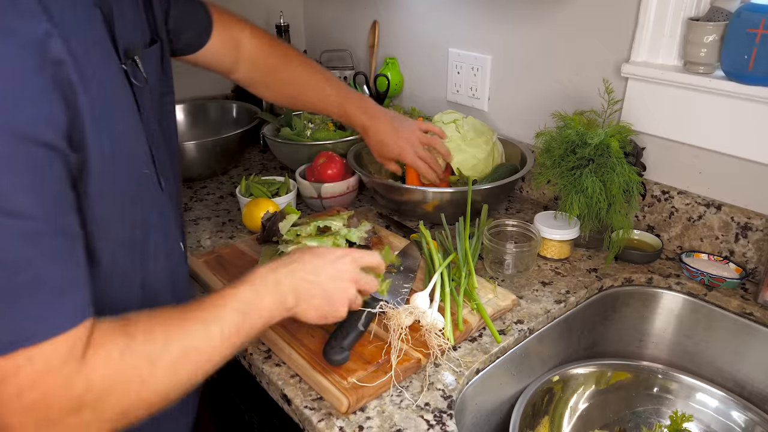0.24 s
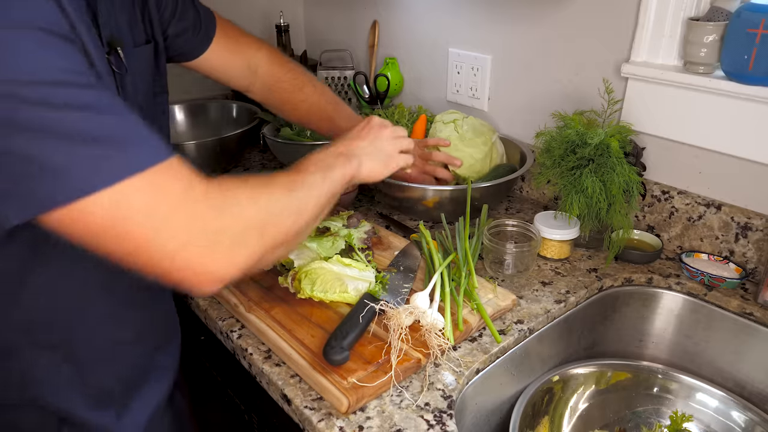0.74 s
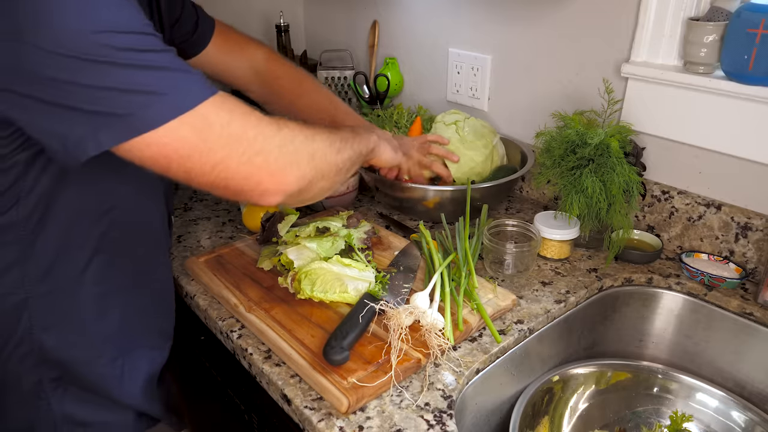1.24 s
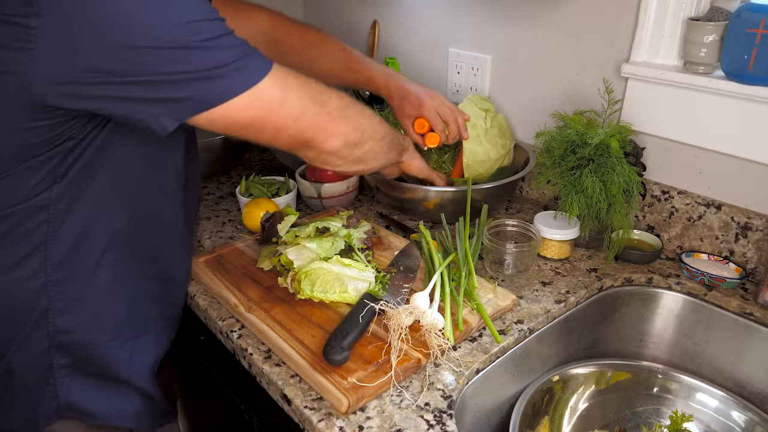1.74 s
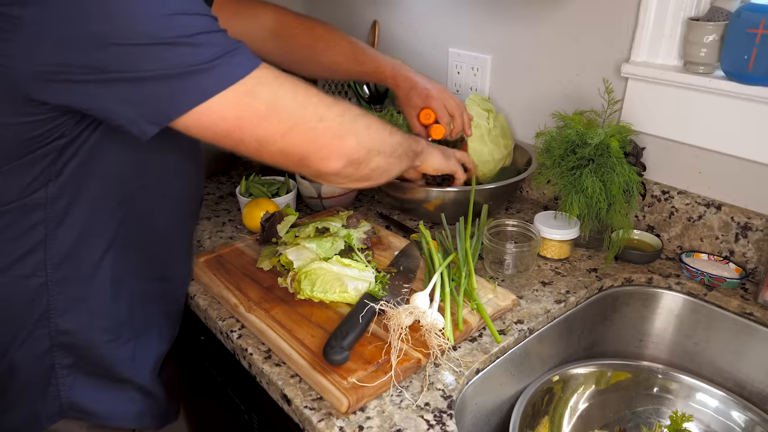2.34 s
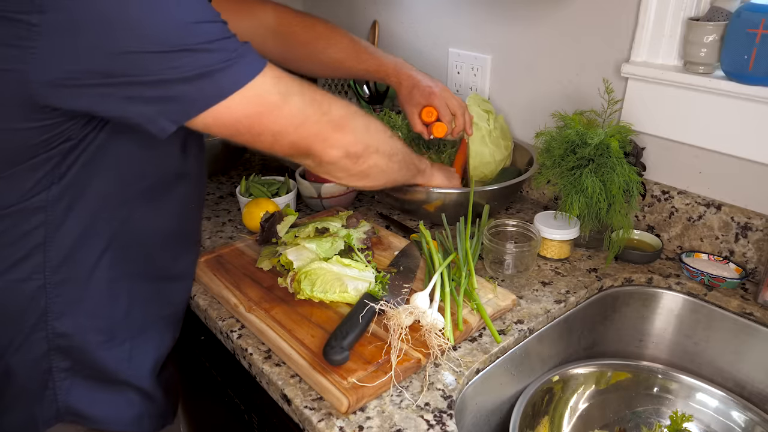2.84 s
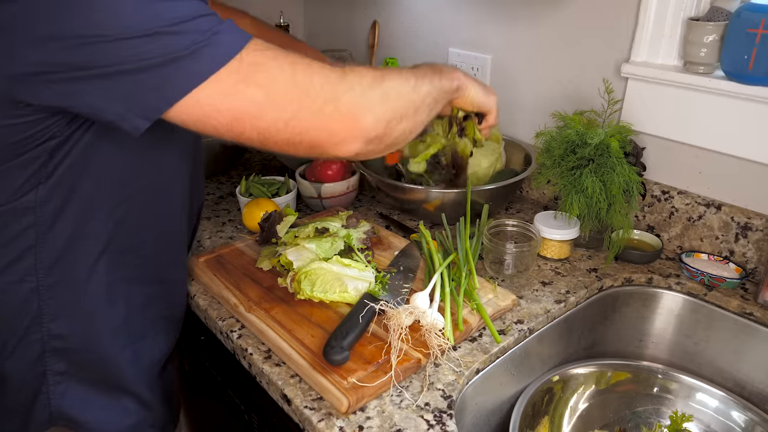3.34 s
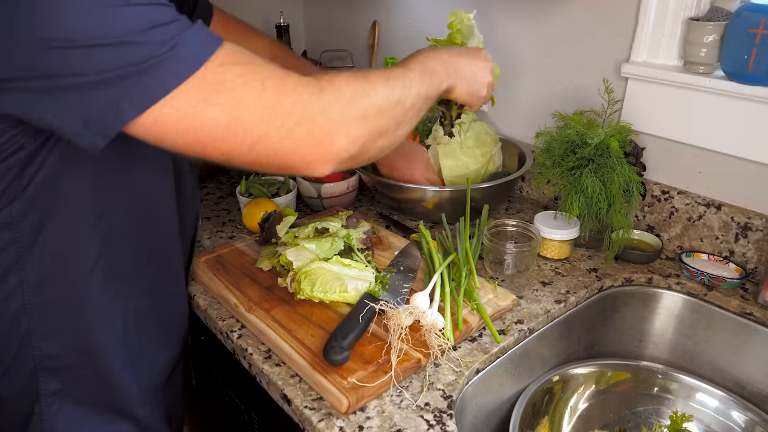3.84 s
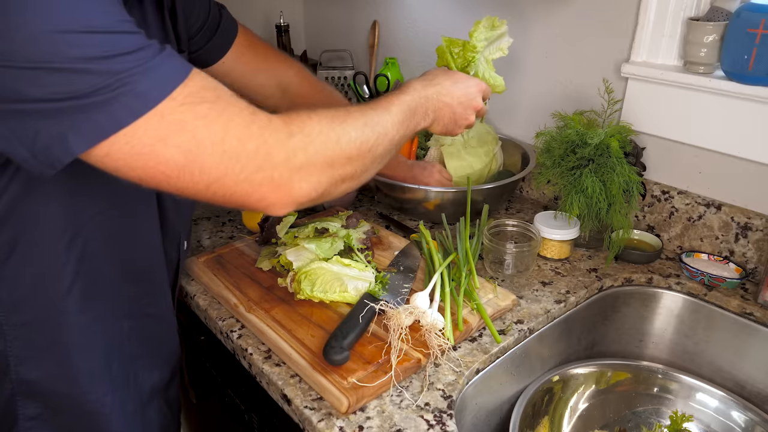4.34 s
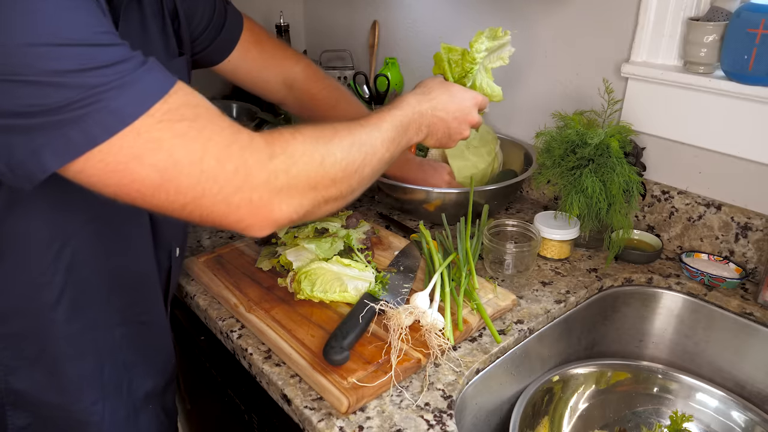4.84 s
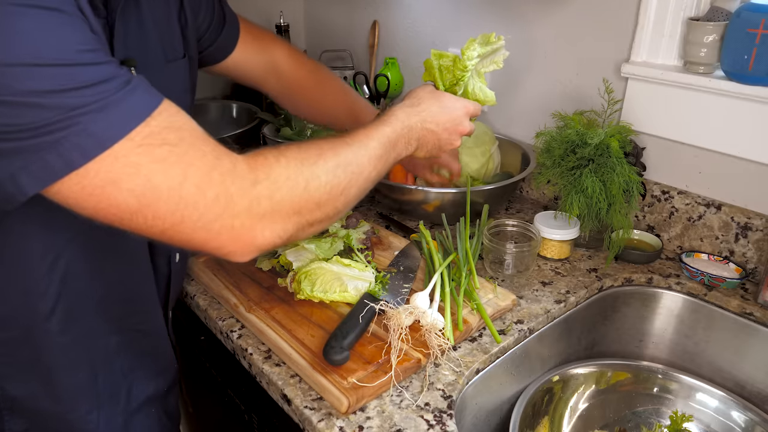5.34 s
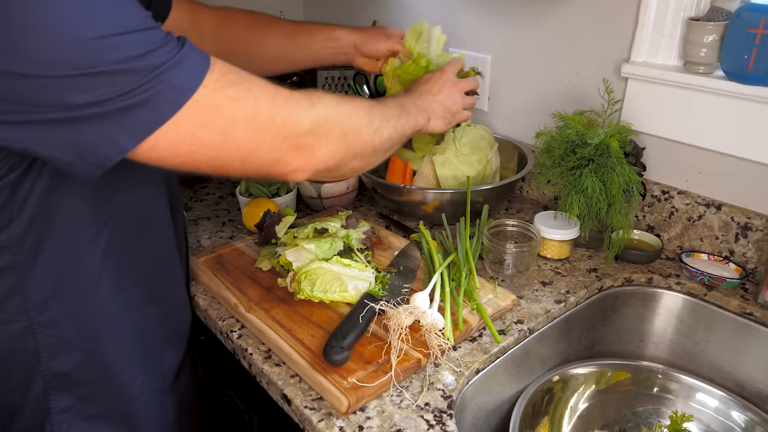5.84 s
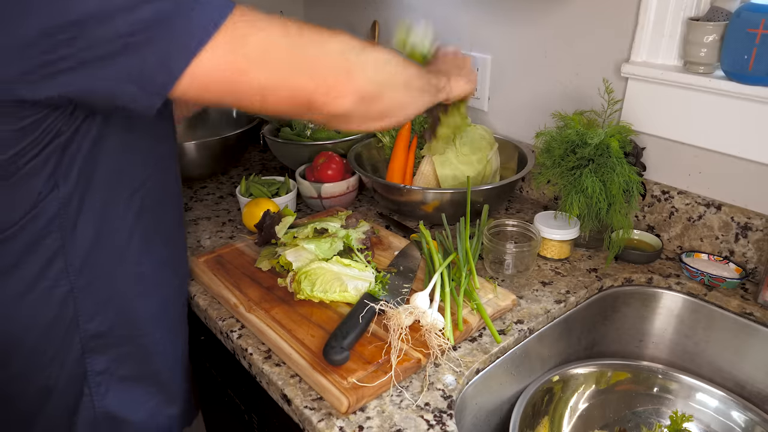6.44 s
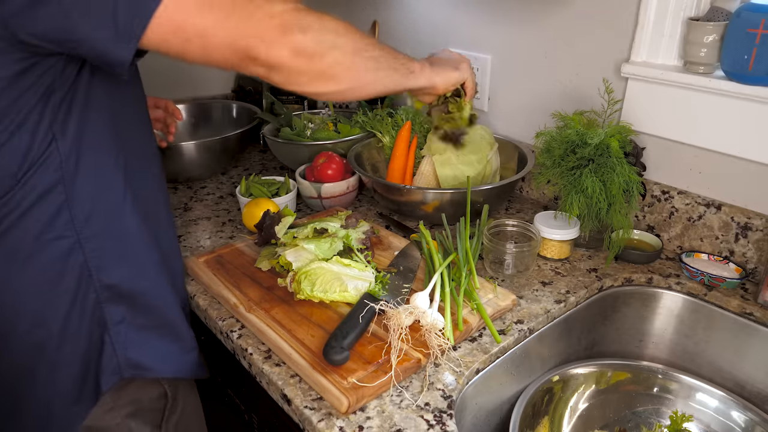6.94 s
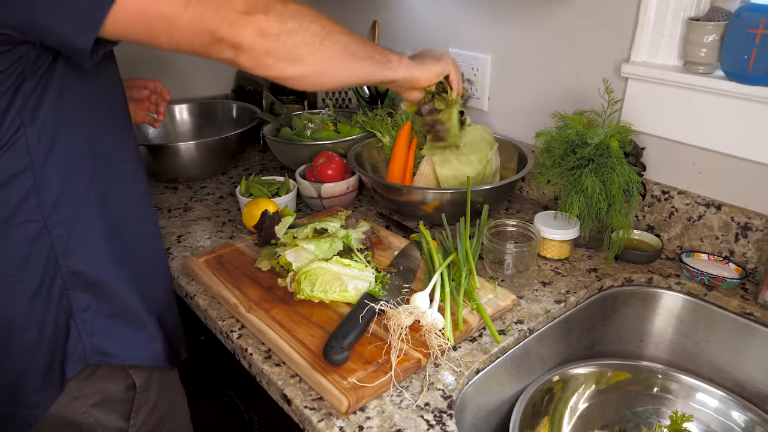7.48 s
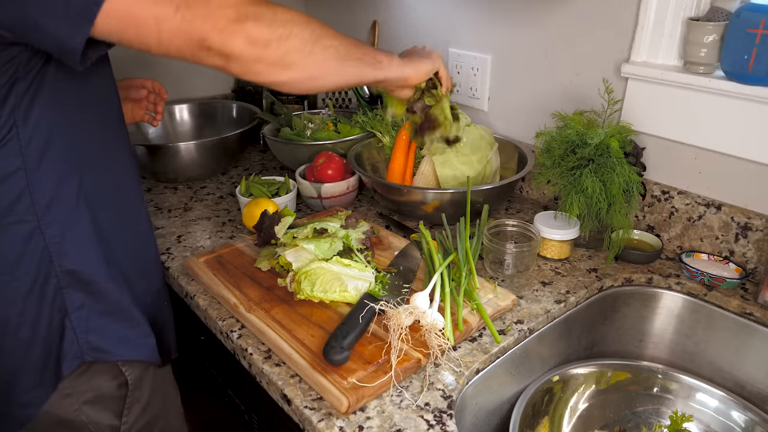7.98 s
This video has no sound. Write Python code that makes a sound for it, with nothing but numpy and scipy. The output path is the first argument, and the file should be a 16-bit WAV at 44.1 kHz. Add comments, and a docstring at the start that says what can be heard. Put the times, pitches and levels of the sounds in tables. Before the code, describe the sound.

Quiet, bass-weighted kitchen air runs throughout, with close mono sound and short room echoes. From 0.3 s fingers rustle lettuce leaves, with a few small snaps. A loaded steel bowl is knocked at about 0.7 and 0.9 s, then more heavily from 1.4 to 1.6 s, with dull damped clanks and a very brief squealing judder on the stone counter. From 1.7 to 3.2 s leaves are pulled harder: bright crackling, swelling rubs and dense snaps, strongest near 2.7-2.9 s, with a low vegetable thump at 2.6. Lighter snaps and soft bumps follow; a sharp cluster of cracks, bowl knocks and a hollow thump comes at 4.3-4.7 s. Crunchy strokes return around 4.9 and 5.2 s, then last snaps near 6.2 s. A faint high gliding whine appears near 1, 3.1-3.8 and 6.1-6.5 s. From 6.55 s to the end, leaves shake regularly, almost six times a second, increasingly flapping and ticking.

```python
"""Lettuce, steel bowl, stone counter

Kitchen, mono microphone, close perspective: direct work over early echoes, a short tail and steady air noise.
A cook digs a lettuce out of a bowl of vegetables, pulls at it and shakes it: click grains rustle,
noisy volleys snap the ribs. Decaying modes ring the knocked bowl, rapid slips make it judder on the stone.
Vegetables thump as damped low sines; a thin whine of parallel gliding tones comes now and then."""
import sys
import numpy as np
from scipy import signal
from scipy.fft import rfft, irfft
from scipy.io import wavfile
from scipy.ndimage import uniform_filter1d

SR = 44100
rng = np.random.default_rng(int(sys.argv[2]) if len(sys.argv) > 2 else 0)


def unload_audio(sound):
    """Save the sound as a 16-bit wav file, at the path given as the first command line argument."""
    columns = np.transpose(np.atleast_2d(sound))
    # keep every value between -1 and 1, then stretch to whole-number steps
    steps = np.round(np.clip(columns, -1, 1) * 32767)
    wavfile.write(sys.argv[1], SR, steps.astype(np.int16))


N = 362061

# All spectra are relative: colour() sets their overall level.
# steady kitchen air: f/Hz, relative level/dB per Hz
AIR_SPECTRUM = [(12, -43), (20, -13), (53, -4.5), (74, -2.5), (120, -1), (154, -6), (193, -6), (222, -10),
                (337, -9), (377, -14), (527, -15), (590, -17), (2820, -27.5), (10500, -27.5), (16000, -35)]
# reverberation of the kitchen: f/Hz, time to fall 60 dB/s
ROOM_T60 = [(150, 0.71), (1000, 0.33), (5000, 0.31), (15000, 0.58)]
# crushed leaf cells: f/Hz, relative level/dB per Hz
CRACKLE_SPECTRUM = [(1290, -49.5), (2200, -2), (2660, -2.5), (4310, -0.5), (6370, -1.5), (14000, -7.5),
                    (15200, -13), (16000, -9)]
# leaves dragged over each other: f/Hz, relative level/dB per Hz
RUBBING_SPECTRUM = [(76, -34), (130, -3), (172, -35), (208, -7), (300, -5.5), (450, -5.5), (517, 2.5),
                    (615, 0.5), (694, -0.5), (805, 0), (896, -5.5), (1010, 1.5), (1110, -2), (2030, -7),
                    (2650, -15), (3200, -21), (4160, -34), (7040, -120)]
# strokes of the hand through the leaves: start t/s, length/s, relative rubbing level/dB,
# crackle above rubbing/dB
STROKES = [(0.301, 0.063, -44.5, 5), (0.38, 0.13, -51.5, 0.5), (0.578, 0.59, -46, 1.5),
           (0.945, 0.21, -45.5, -4.5), (1.193, 0.065, -47, 0.5), (1.321, 0.095, -40.5, -6.5),
           (1.588, 0.092, -43, -20), (1.745, 0.19, -39.5, -0.5), (1.915, 0.16, -32, 0),
           (2.11, 0.034, -34, -2.5), (2.163, 0.051, -37.5, 1.5), (2.238, 0.19, -44, 3.5),
           (2.43, 0.17, -44, 0), (2.565, 0.063, -32, -0.5), (2.687, 0.044, -32.5, -3), (2.73, .16, -30, 0),
           (2.911, 0.025, -35, 8), (2.94, 0.35, -41.5, 3.5), (3.283, 0.36, -47, 3), (3.69, 0.19, -51, -0.5),
           (3.99, 0.067, -49, -11), (4.376, 0.029, -48, -1), (4.767, 0.058, -55, 7.5),
           (4.832, 0.046, -44, -6), (4.888, 0.077, -30, -1), (4.975, .05, -49, 5), (5.035, 0.091, -52, 6),
           (5.203, 0.33, -29.5, -1), (5.545, 0.064, -46.5, 2), (5.812, 0.18, -50, 4.5),
           (5.912, .2, -40.5, 3), (6.178, 0.1, -37, 3), (6.353, 0.16, -54, 3)]
# ribs and leaf edges snapping: t/s, relative crack level/dB, relative dull body level/dB, f/Hz
SNAPS = [(0.3159, -21, -28, 1380), (0.404, -21, -33, 1900), (0.643, -28, -30, 1930),
         (0.692, -35, -30.5, 1300), (1.6997, -24, -52, 5500), (1.7724, -19.5, -26, 5330),
         (1.852, -16, -39, 8200), (1.8999, -18, -42, 6700), (2.0073, -16.5, -24, 3070),
         (2.0664, -18.5, -31, 3720), (2.149, -20, -38, 1400), (2.1758, -15.5, -34, 7000),
         (2.186, -19.5, -40, 6000), (2.2084, -16.5, -44, 4960), (2.297, -20, -35, 4800),
         (2.365, -23.5, -34, 3620), (2.6429, -15, -21, 1410), (2.7315, -7, -33, 1500),
         (2.7704, -10.5, -32, 1300), (2.8272, -18, -27, 2220), (2.8705, -10, -48, 2070),
         (2.9277, -17, -42, 6950), (3.0338, -19.5, -28.5, 4100), (3.1403, -19, -33, 2600),
         (3.1621, -34, -24.5, 1260), (3.3839, -21, -25, 1260), (3.459, -28.5, -45, 1610),
         (3.5363, -19, -26, 8700), (3.6253, -16.5, -33, 6100), (3.7748, -25.5, -35, 2820),
         (3.831, -28, -40, 2680), (3.956, -29, -36, 1320), (4.014, -29, -34, 5500),
         (4.0347, -20, -30, 4600), (4.187, -46, -36.5, 1500), (4.3409, -8, -35, 4700),
         (4.398, -14, -26.5, 1720), (4.4832, -23.5, -30, 1250), (4.5116, -14, -27, 1170),
         (4.5225, -17, -35, 1860), (4.5312, -7.5, -22, 4600), (4.6477, -14, -30, 7250),
         (4.9018, -18, -23, 1350), (5.1938, -19.5, -33, 1490), (5.2099, -27, -33, 2100),
         (5.3966, -27, -37, 1190), (5.4543, -25, -28, 2010), (5.6964, -28.5, -47, 5400),
         (6.1617, -21, -35, 1300), (6.1907, -17.5, -26, 6100), (6.201, -15.5, -26, 3170),
         (6.3106, -16, -45, 1770), (6.3284, -21, -32.5, 1530)]
# bright part of a snap or contact: f/Hz, relative level/dB per Hz
CRACK_SPECTRUM = [(700, -32), (1900, -5), (2900, -11), (4200, -1), (6200, -1), (8500, -4.5), (12000, -11.5),
                  (16000, -17)]
# dull part of any contact: f/Hz, relative level/dB per Hz
BODY_SPECTRUM = [(100, -14), (300, 0), (600, 7.5), (1000, -2.5), (1900, -2), (2800, -14), (6000, -25),
                 (14000, -43)]
# knocks on the bowl: t/s, relative ring, thud and tick levels/dB, place (0 wall to 1 base),
# contacts as it rocks (count)
KNOCKS = [(0.7394, -23.5, -18, -33, .2, 2), (0.899, -31.5, -32, -28, 1, 1),
          (0.9033, -22.5, -11, -17, 0.99, 1), (1.38, -26, -7.5, -14, 0.84, 1),
          (1.4176, -36.5, -13, -18.5, 1, 3), (1.502, -37, -11.5, -18, .1, 1),
          (1.563, -25, -8.5, -12.5, 0.53, 1), (4.586, -36, -18, -25, .95, 1),
          (4.5953, -34, -16.5, -14, 0.92, 3), (4.683, -27.5, -25, -22.5, 0.15, 1),
          (4.855, -28, -35, -27, .17, 1)]
# modes of the steel bowl: f/Hz, time to fall 60 dB/s, relative level/dB struck on the wall,
# relative level/dB struck through the base
BOWL_MODES = [(291.5, 0.19, 4.5, -18.5), (443, 0.19, -29, -13), (498, 0.18, -20, 2.5),
              (609, 0.24, -5.5, -9), (770, 0.081, -10, -15), (865, 0.17, -14, -19), (1025, 0.18, -40, -11),
              (1138, 0.18, -3, -17.5), (1288, 0.13, 0.5, -16), (1580, 0.12, -18, -38),
              (1722, 0.063, -11.5, 6), (2090, 0.062, -26, -9), (2117, 0.23, -8, -42),
              (2220, 0.064, -31, -27), (2150, .13, -21, -33), (2780, 0.043, -17, -14),
              (3200, 0.19, -9, -44), (3460, 0.16, -7, -47), (4030, 0.077, -17, -40), (5620, 0.08, -35, -9),
              (5420, .12, -42, -28), (5730, 0.037, -38, -7.5), (7250, .08, -42, -28)]
# counter under the bowl: f/Hz, relative level/dB per Hz
BOOM_SPECTRUM = [(45, -6), (75, 3.5), (115, 2), (160, -5), (300, -21)]
# vegetables shifting, and the low boom under the bowl knocks at 4.69 and 4.87 s: t/s, relative level/dB, f/Hz
THUMPS = [(.745, -20, 102), (1.563, -28, 129), (1.66, -25, 102), (1.76, -29, 80), (1.85, -30, 88),
          (2.012, -33, 105), (2.606, -23.5, 112), (2.618, -13.5, 96.4), (3.555, -14, 288),
          (3.566, -20.5, 161), (3.671, -16, 216), (3.686, -17, 167), (3.71, -25, 109), (3.862, -28.5, 111),
          (4.033, -29, 135), (4.396, -24.5, 322), (4.513, -18, 550), (4.52, -33, 132), (4.5945, -13.5, 660),
          (4.601, -9, 730), (4.69, -35, 84), (4.87, -33, 84), (5.545, -24.5, 230), (5.556, -30, 100),
          (6.469, -30.5, 165)]
# thin whine, one list per glide: t/s, f/Hz, relative level/dB
WHINES = [
    [(.94, 10800, -66), (1.02, 12800, -55), (1.08, 10500, -68), (1.14, 12470, -52.5), (1.21, 10500, -63)],
    [(3.1, 11500, -51), (3.22, 13400, -48), (3.31, 11600, -58), (3.39, 13400, -46), (3.47, 11800, -54),
     (3.56, 13400, -50), (3.61, 12800, -50), (3.7, 15000, -50), (3.79, 11700, -55)],
    [(6.12, 11700, -52), (6.25, 14400, -53), (6.31, 15800, -44), (6.43, 15600, -50), (6.5, 13700, -45),
     (6.56, 11800, -62)],
]
# parallel strands of the whine: share of its pitch (ratio)
STRAND_SHARES = (1, .87, 1.22)
# the same strands: level/dB relative to the glide
STRAND_DB = (-1, -8, -5)
# the bowl's base sticks and slips on the stone: first slip t/s, end t/s, rate/slips per s
JUDDER = (1.4692, 1.556, 122)
# squeal of bowl on stone: f/Hz, width/Hz, relative level/dB
SQUEAL = [(554, 250, 14), (1020, 220, -4), (1600, 160, -13), (2240, 145, 12.5), (5280, 550, 9)]
# downward shakes of the leaves, each followed by a swing back: t/s, relative level/dB
SHAKES = [(6.562, -34), (6.756, -34.5), (6.939, -41.5), (7.125, -33), (7.295, -33), (7.473, -32),
          (7.643, -32), (7.819, -31.5), (8.003, -32.5), (8.183, -33)]
# shaken leaves: f/Hz, relative level/dB per Hz
SWISH_SPECTRUM = [(150, -26), (250, -14), (292, -7.5), (407, -2.5), (468, 0.5), (698, -11), (816, -4),
                  (906, -6), (2090, -3), (3010, -8.5), (10000, -12.5), (14400, -16.5), (16000, -24)]

# Source levels are relative, ahead of the mix.
AIR_DB = -48
CUTOFF_HZ = 15900

FIRST_TOUCH_S = .3   # from here on the hands stay on the leaves
RESTING_DB, RESTING_CRISP_DB = -59, 3.5   # rustle between strokes; its crackle above rubbing
ATTACK_S, RELEASE_DB_PER_S = 0.0058, 335
SWELL_DB_PER_S = 16.5   # the longer a stroke, the more it swells towards its middle
SMALL_SNAPS_PER_S, SMALL_SNAP_SPREAD_DB = 20, 5   # chance snaps in any rustle
SMALL_SNAP_HZ = (1250, 7040)   # lowest, highest

ROCK_S, ROCK_LOSS_DB = .013, 1.85   # from one contact of the rocking bowl to the next
THUMP_CYCLES = 7.7   # cycles until a thump's decay is 60 dB down

LOOSEN_S = 1   # the leaves come apart over this time; pairs below are (tight, loose)
# a half-time runs from the peak of a swing to 1/e of its power
WHIP_HALF_S, FLAP_DB, FLUTTER_DB, EDGE_TICK_DB = (0.025, 0.011), (-46, -29.5), (-50, -46.5), (-36.5, -25)
BACK_AFTER_S, BACK_DB, BACK_HALF_S = (0.098, 0.076), (-35.5, -35.5), 0.021
FLAP_HZ, EDGE_TICK_LEAD_S = 293, 0.012
FLAP_POP_DB = 1   # dull pop of the flap, relative to its thump
# the leaf tips flick just before each shake; level relative to the edge tick
FLICK_LEAD_S, FLICK_DB, FLICK_HZ = 0.029, -4, 7030


def from_db(db):
    """Decibels to gain."""
    return np.exp(np.asarray(db) * (np.log(10) / 20))


def rms_one(x):
    """Scale to rms 1."""
    return x / np.sqrt(np.mean(x ** 2) + 1e-20)


def in_time(rows):
    """Join curve rows by straight lines, one array per column."""
    s, *columns = np.transpose(rows)
    return [np.interp(np.arange(N) / SR, s, column) for column in columns]


def at_hz(points, hz):
    """Read a table on a log-frequency axis."""
    f, value = np.transpose(points)
    return np.interp(np.log(np.maximum(hz, 1)), np.log(f), value)


def add(track, s, sound):
    """Mix a sound into a track from time s on."""
    i = int(np.clip(round(s * SR), 0, N - 1))
    track[i:i + len(sound)] += sound[:N - i]


def colour(x, spectrum, size=4096):
    """Causal filter with the given spectrum, falling away outside it; white noise keeps its level."""
    hz = np.maximum(np.fft.rfftfreq(size, 1 / SR), 1)
    skirts = np.minimum(1, hz / spectrum[0][0]) * np.minimum(1, spectrum[-1][0] / hz)
    gain = rms_one(from_db(at_hz(spectrum, hz)) * skirts ** 2)
    # folding the cepstrum forward in time gives minimum phase
    cepstrum = irfft(np.log(gain + 1e-6))
    cepstrum[1:size // 2] *= 2
    cepstrum[size // 2 + 1:] = 0
    return signal.oaconvolve(x, irfft(np.exp(rfft(cepstrum))))[:N]


def resonance(x, hz, width):
    """Band-pass with gain 1 on top."""
    return signal.lfilter(*signal.iirpeak(hz, hz / width, fs=SR), x)


def drift(rate):
    """Chance values, up to 400 a second, joined by straight lines."""
    return np.interp(np.arange(N) * min(rate, 400) / SR, np.arange(4000), rng.standard_normal(4000))


def decay(t60):
    """Envelope that starts at 1 and ends 60 dB down."""
    return from_db(-60 * np.arange(int(t60 * SR) + 2) / (t60 * SR))


def volley(t60, rise_s=0.00044):
    """A dense run of tiny fractures or contacts that builds quickly and dies away."""
    fade = decay(t60)
    signs = np.resize(rng.choice([-1, 1], size=8192), len(fade))
    rise = 1 - np.exp(-np.arange(len(fade)) / (rise_s * SR))
    return fade * rise * signs


def bursts(times, levels_db, t60):
    """One volley at each time."""
    out = np.zeros(N)
    for s, db in zip(times, levels_db):
        add(out, s, from_db(db) * volley(t60))
    return out


def kitchen_air():
    """Steady air noise of the kitchen: white noise shaped towards the bass."""
    return from_db(AIR_DB) * colour(rng.standard_normal(N), AIR_SPECTRUM)


def grains(per_s, spread_db, clump_db, hiss):
    """Leaf cells giving way: clumps of clicks of uneven size over a smooth slide, levelled to about rms 1."""
    sizes = from_db(spread_db * np.minimum(rng.exponential(1, N), 4))
    clicks = sizes * rng.choice([-1, 1], N) * (rng.random(N) < per_s / SR)
    x = rms_one(clicks) + hiss * rng.standard_normal(N)
    x = x * from_db(clump_db * drift(170))
    local_power = np.abs(uniform_filter1d(x ** 2, size=2400))
    return x / np.sqrt(local_power + 1e-9)


def flexing(x, patchy_db):
    """Bending leaves keep changing their resonances, so half-octave patches swell and fade."""
    for hz in np.geomspace(450, 7200, 9):
        x = x + (from_db(patchy_db * drift(45)) - 1) * resonance(x, hz, 0.36 * hz)
    return rms_one(x)


def stroke_gains():
    """Each stroke sets in quickly, swells with the speed of the hand and lets go: gains of rubbing and crackle."""
    t = np.arange(N) / SR
    rubbing_power = from_db(RESTING_DB) ** 2 * (t > FIRST_TOUCH_S)
    crackle_power = rubbing_power * from_db(RESTING_CRISP_DB) ** 2
    age = t[:SR]
    for start, length, db, crisp_db in STROKES:
        speed = np.sin(np.pi * np.clip(age / length, 0, 1))
        fall_db = SWELL_DB_PER_S * length * (1 - speed) + RELEASE_DB_PER_S * np.maximum(age - length, 0)
        power = (np.minimum(age / ATTACK_S, 1) * from_db(db - fall_db)) ** 2
        add(rubbing_power, start, power)
        add(crackle_power, start, power * from_db(crisp_db) ** 2)
    return np.sqrt(rubbing_power), np.sqrt(crackle_power)


def handled_leaves():
    """Fingers crush the leaves (bright crackle, small snaps) and drag them over each other (darker rubbing)."""
    rubbing_gain, crackle_gain = stroke_gains()
    crushed = grains(per_s=1500, spread_db=4.0, clump_db=2.3, hiss=0.68)
    crackle = flexing(colour(crushed, CRACKLE_SPECTRUM), patchy_db=3.5)
    dragged = grains(per_s=1400, spread_db=2.5, clump_db=2.5, hiss=0.61)
    rubbing = flexing(colour(dragged, RUBBING_SPECTRUM), patchy_db=1.5)
    crisp = from_db(-1.5) * crackle + small_snaps(crack_db=10, body_db=-1.5)
    return crackle_gain * crisp + from_db(1.0) * rubbing_gain * rubbing


def small_snaps(crack_db, body_db):
    """Little snaps at random times and pitches, at levels relative to the rustle that carries them."""
    draws = rng.random((400, 3))[:int(SMALL_SNAPS_PER_S * N / SR)]
    low, high = SMALL_SNAP_HZ
    return snaps([(when * N / SR, crack_db + SMALL_SNAP_SPREAD_DB * size, body_db, low * (high / low) ** pitch)
                  for when, size, pitch in draws])


def snaps(rows):
    """A rib breaks with a bright crack, pitched by the size of the piece; the leaf around it gives a duller pop."""
    s, crack_db, body_db, pitch_hz = np.transpose(rows)
    pitched = np.zeros(N)
    for at, db, hz in zip(s, crack_db, pitch_hz):
        ping = resonance(volley(t60=0.024), hz, 0.23 * hz)
        limp_db = at_hz([(1400, -7.5), (4300, -3.5)], hz)   # large, limp pieces ring less
        add(pitched, at, from_db(db + limp_db) * ping / np.abs(ping).max())
    crack = colour(bursts(s, crack_db - 10, t60=0.041), CRACK_SPECTRUM)
    pop = colour(bursts(s, body_db - 1.0, t60=0.052), BODY_SPECTRUM)
    return pitched + crack + pop


def kitchen_echoes(x, early_db, tail_db, early_t60):
    """Scattered echoes from counter and wall, then a short tail that fades at its own rate in each band."""
    t = np.arange(SR // 2) / SR
    tail, edges = np.zeros(len(t)), np.geomspace(60, 17000, 9)
    for low, high in zip(edges, edges[1:]):
        band_pass = signal.butter(2, [low, high], "band", fs=SR, output="sos")
        band = signal.sosfilt(band_pass, rng.standard_normal(len(t)))
        tail += band * from_db(-60 * t / at_hz(ROOM_T60, np.sqrt(low * high)))
    tail *= np.clip(t / 0.0049, 0, 1)
    early = rng.standard_normal(len(t)) * (t > .0015) * from_db(-60 * t / early_t60)
    echoes = from_db(early_db) * early / np.linalg.norm(early)
    echoes += from_db(tail_db) * tail / np.linalg.norm(tail)
    return signal.oaconvolve(x, echoes)[:N]


def bowl_ring(blows, uneven_db):
    """Blows (t/s, level/dB, place) ring the bowl's modes, each with a strength set by place and chance."""
    out = np.zeros(N)
    for s, db, place in blows:
        chances = rng.standard_normal((len(BOWL_MODES), 2))
        for (hz, t60, wall_db, base_db), (uneven, sign) in zip(BOWL_MODES, chances):
            fade = decay(t60)
            mode_db = wall_db + place * (base_db - wall_db)
            gain = from_db(db + mode_db + uneven_db * uneven) * np.sign(sign)
            add(out, s, gain * fade * np.sin(2 * np.pi * hz * np.arange(len(fade)) / SR))
    return out


def bowl_knocks():
    """The loaded bowl is knocked: a tick, a damped thud, a boom from the counter and the ring of the steel."""
    contacts = [(s + k * ROCK_S, *(np.array(levels_db) - k * ROCK_LOSS_DB), place)
                for s, *levels_db, place, count in KNOCKS for k in range(round(count))]
    s, ring_db, thud_db, tick_db, place = np.transpose(contacts)
    thud = colour(bursts(s, thud_db - 3, t60=0.04), BODY_SPECTRUM)
    tick = colour(bursts(s, tick_db - 9.0, t60=0.059), CRACK_SPECTRUM)
    boom = colour(bursts(s, thud_db - 24.5, t60=0.23), BOOM_SPECTRUM)
    # the free wall also has a crowd of close upper modes
    shimmer = colour(bursts(s, ring_db - 7.5 - 9 * place, t60=0.17),
                     [(900, -5), (1500, 1), (3300, -8), (4500, -20), (9000, -43)])
    return thud + tick + boom + shimmer + bowl_ring(zip(s, ring_db, place), uneven_db=4.0)


def thumps(rows):
    """Soft heavy contacts swell within a cycle and die after a few more."""
    out = np.zeros(N)
    for s, db, hz in rows:
        fade = decay(THUMP_CYCLES / hz)
        cycles = hz * np.arange(len(fade)) / SR
        swell = 1 - np.exp(-cycles / 0.25)
        add(out, s, from_db(db + 5.0) * fade * swell * np.sin(2 * np.pi * cycles))
    # small bodies radiate little deep bass, and a wall echo weakens one low band
    out = signal.sosfilt(signal.butter(2, 45, "high", fs=SR, output="sos"), out)
    return out - .5 * resonance(out, 168, 22)


def during(rows):
    """A soft gate, open while a curve lasts."""
    t = np.arange(N) / SR
    return np.clip(np.minimum(t - rows[0][0], rows[-1][0] - t) / .015 + 1, 0, 1)


def whine():
    """Faint, fluttering parallel tones glide in smooth arcs at the top of the treble."""
    hz, db = in_time(sorted(row for glide in WHINES for row in glide))
    wavering_hz = uniform_filter1d(hz, size=2200) + 80 * drift(400)
    phase = 2 * np.pi * np.cumsum(wavering_hz) / SR
    strands = sum(from_db(db + strand_db + 4.7 * drift(45)) * np.sin(share * phase)
                  for share, strand_db in zip(STRAND_SHARES, STRAND_DB))
    return sum(during(glide) for glide in WHINES) * strands


def bowl_judder(ring_db, tick_db):
    """Pushed over the stone, the bowl moves in quick slips that make it squeal."""
    start, end, per_s = JUDDER
    s = np.arange(start, end, 1 / per_s)
    slips = bursts(s, tick_db + rng.normal(0, 0.66, len(s)), t60=0.026)
    squeal = sum(from_db(db + 2.5) * resonance(slips, hz, width) for hz, width, db in SQUEAL)
    grit = from_db(-12.5) * colour(slips, CRACK_SPECTRUM)
    return squeal + grit + bowl_ring([(at, ring_db, 1) for at in s], uneven_db=1.0)


def shaken_leaves():
    """At each turn of the hand the leaves whip against each other; loosening, they whip faster, flap and tick."""
    t = np.arange(N) / SR
    first = SHAKES[0][0]
    reach = .1   # s, either side of a swing's peak

    def loosened(pair, s):
        """Slide from the tight to the loose value."""
        return np.interp(s, [first, first + LOOSEN_S], pair)

    def swing(db, half):
        """Power of one swing, a bell in time."""
        return from_db(db) ** 2 * np.exp(-((t[t < 2 * reach] - reach) / half) ** 2)

    power = from_db(loosened(FLUTTER_DB, t)) ** 2 * (t > first)
    flaps, ticks = [], []
    for s, db in SHAKES:
        back = s + loosened(BACK_AFTER_S, s)
        tick_db, flap_db = loosened(EDGE_TICK_DB, s), loosened(FLAP_DB, s)
        add(power, s - reach, swing(db, loosened(WHIP_HALF_S, s)))
        add(power, back - reach, swing(loosened(BACK_DB, s), BACK_HALF_S))
        flaps.append((s - .002, flap_db, FLAP_HZ))
        # tips flick, leaves flap, edges tick on the way back
        ticks += [(s - FLICK_LEAD_S, tick_db + FLICK_DB, tick_db - 30, FLICK_HZ),
                  (s - .002, flap_db + 2, flap_db + FLAP_POP_DB, 1400),
                  (back - EDGE_TICK_LEAD_S, tick_db, tick_db - 33, 2100)]
    rustle = colour(grains(per_s=1500, spread_db=3.5, clump_db=3.0, hiss=0.51), SWISH_SPECTRUM)
    swish = rustle + small_snaps(crack_db=9.5, body_db=-4.5)
    return from_db(-0.5) * np.sqrt(power) * swish + thumps(flaps) + snaps(ticks)


def scene():
    """All the work at the counter, heard in the kitchen over its steady air noise."""
    leaves = handled_leaves() + shaken_leaves() + snaps(SNAPS)
    bowl = bowl_knocks() + bowl_judder(ring_db=-36, tick_db=-20.0)
    work = leaves + bowl + thumps(THUMPS)
    # the hands move between two spots, each with its own pattern of echoes
    spot = 1.83 * drift(9)
    echoes = sum(kitchen_echoes(work * share, early_db=-10.0, tail_db=-10.5, early_t60=0.051)
                 for share in (np.cos(spot), np.sin(spot)))
    return (from_db(-1.19) * (work + echoes) + kitchen_air() + whine())[None]


def record(dry):
    """The top is cut steeply."""
    return signal.sosfilt(signal.ellip(12, .1, 80, CUTOFF_HZ, fs=SR, output="sos"), dry)


dry = scene()
out = record(dry)
unload_audio(out)
```